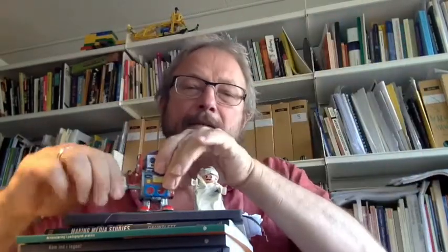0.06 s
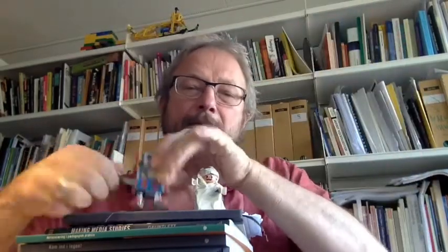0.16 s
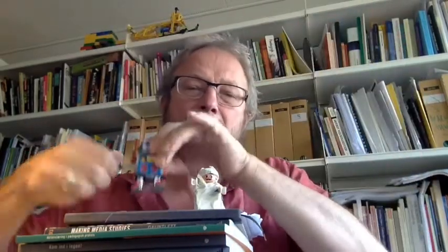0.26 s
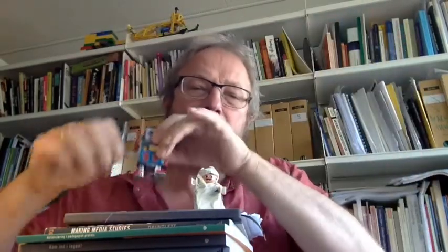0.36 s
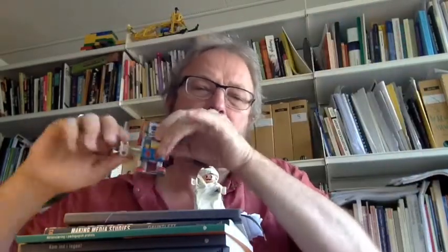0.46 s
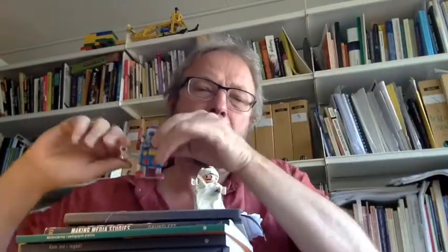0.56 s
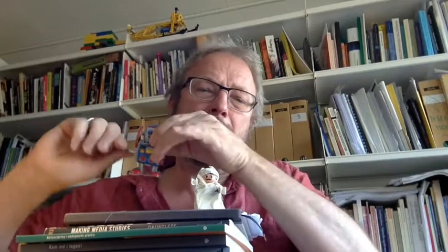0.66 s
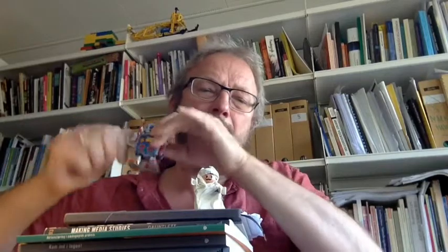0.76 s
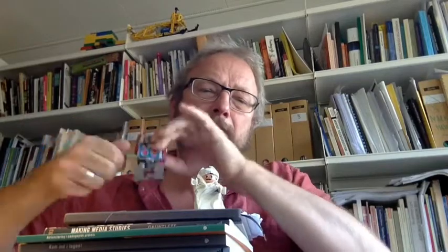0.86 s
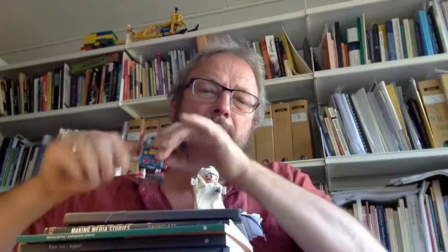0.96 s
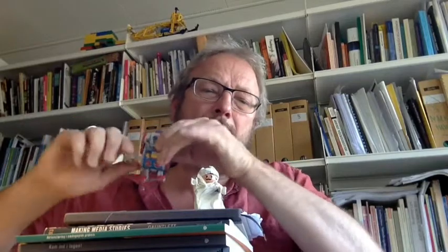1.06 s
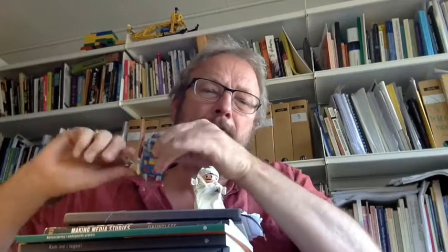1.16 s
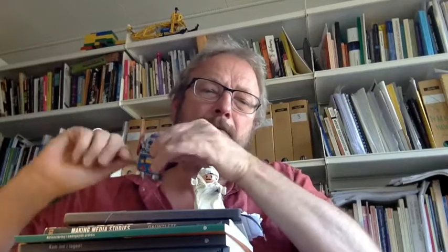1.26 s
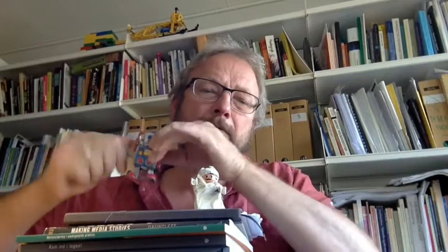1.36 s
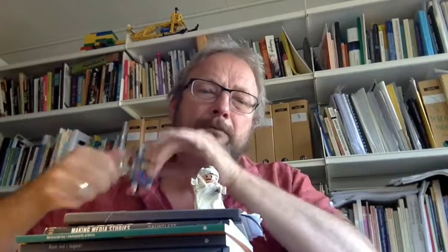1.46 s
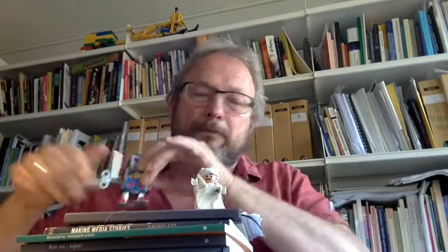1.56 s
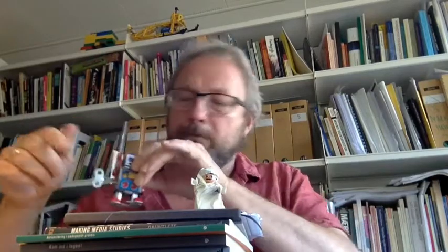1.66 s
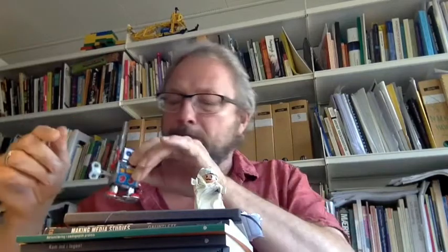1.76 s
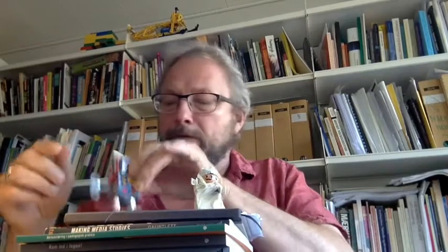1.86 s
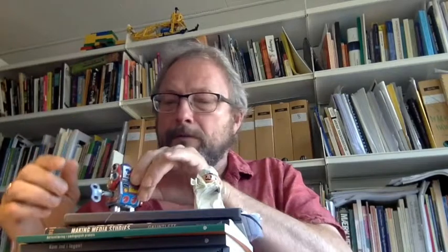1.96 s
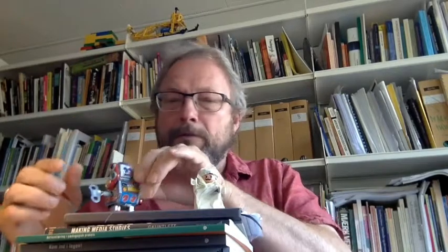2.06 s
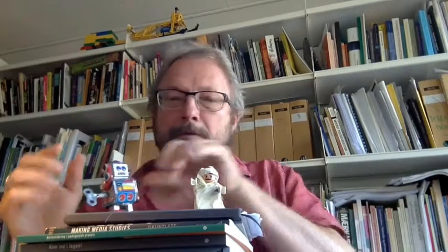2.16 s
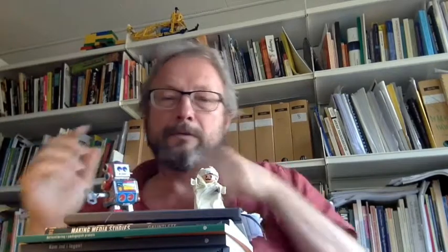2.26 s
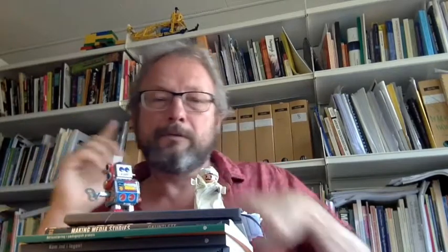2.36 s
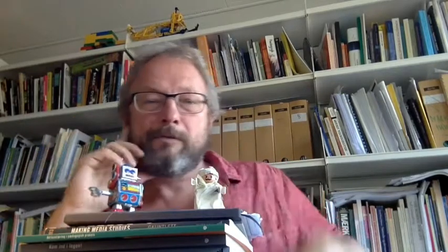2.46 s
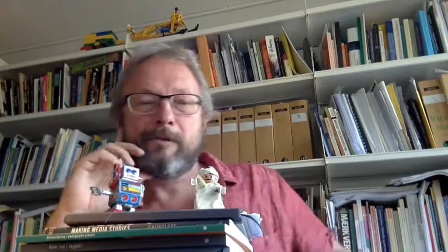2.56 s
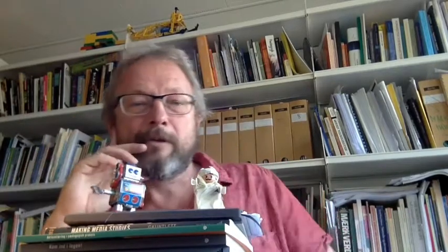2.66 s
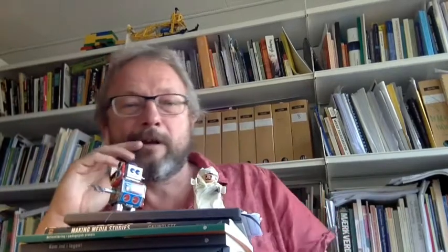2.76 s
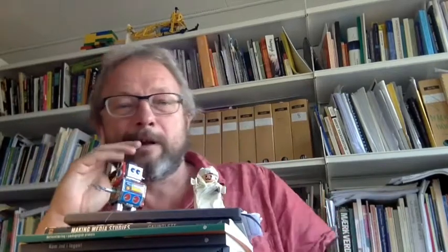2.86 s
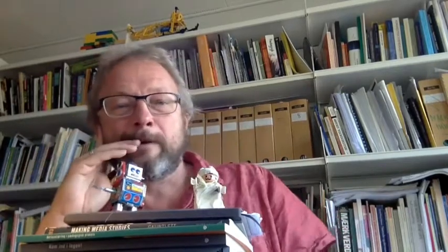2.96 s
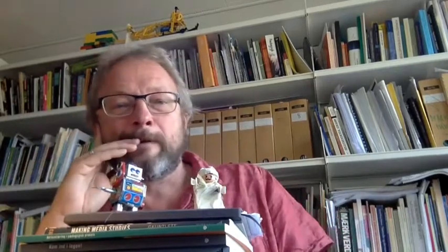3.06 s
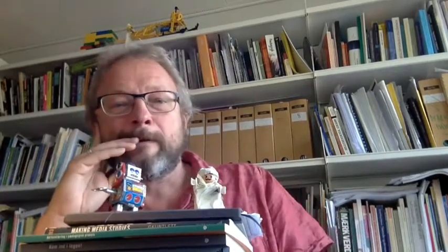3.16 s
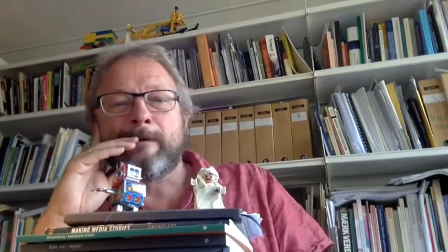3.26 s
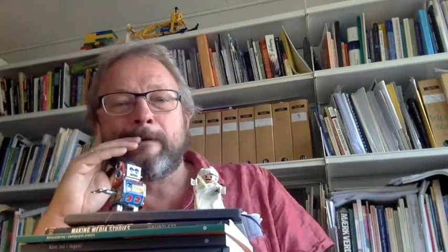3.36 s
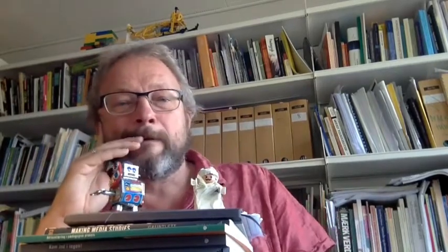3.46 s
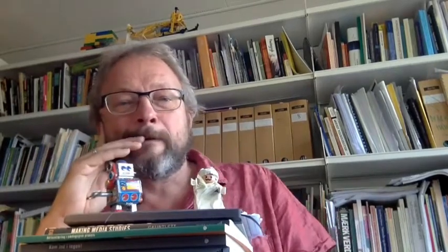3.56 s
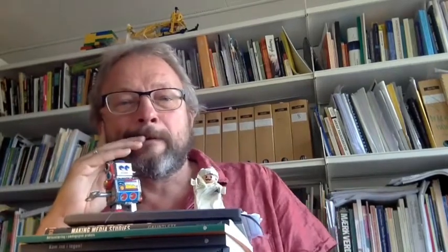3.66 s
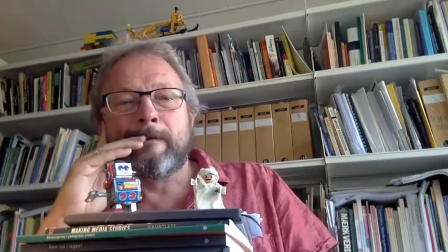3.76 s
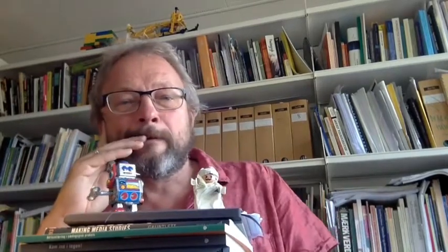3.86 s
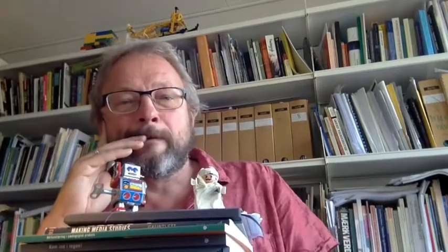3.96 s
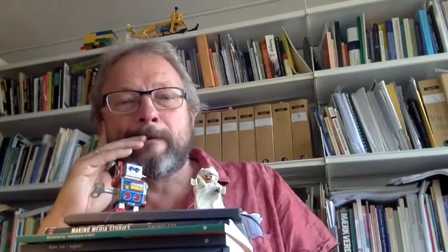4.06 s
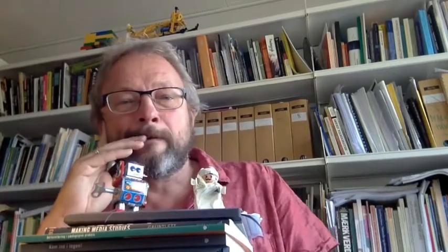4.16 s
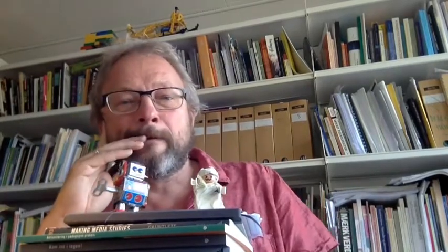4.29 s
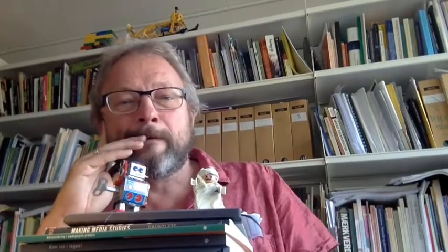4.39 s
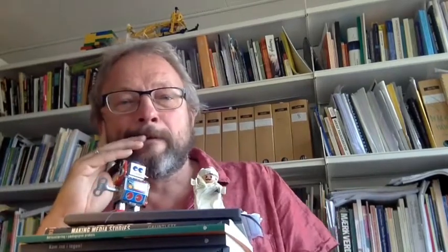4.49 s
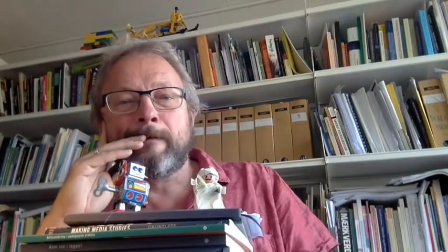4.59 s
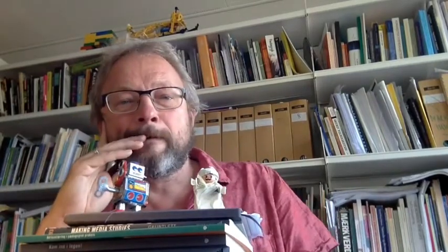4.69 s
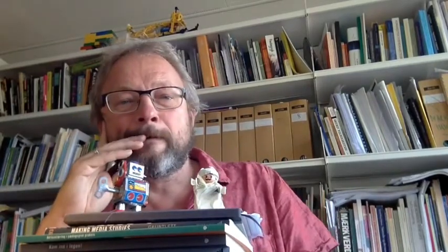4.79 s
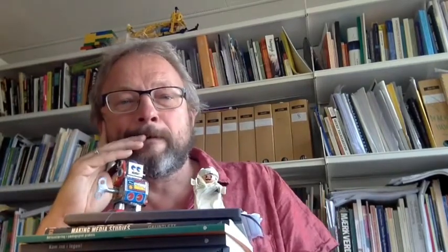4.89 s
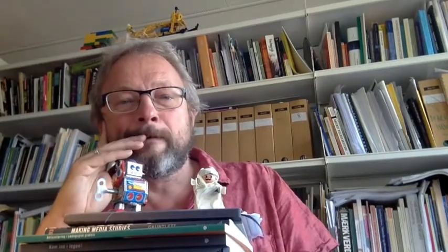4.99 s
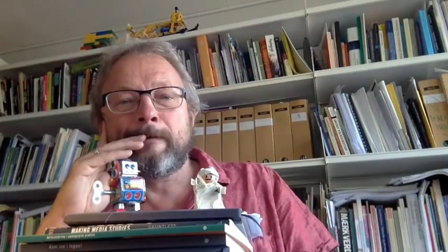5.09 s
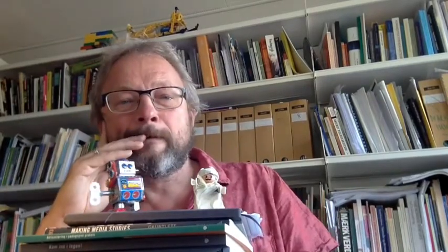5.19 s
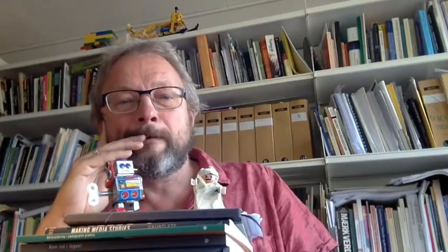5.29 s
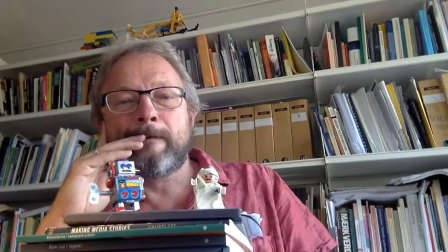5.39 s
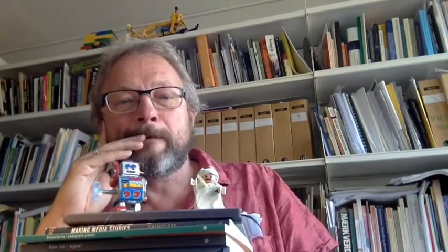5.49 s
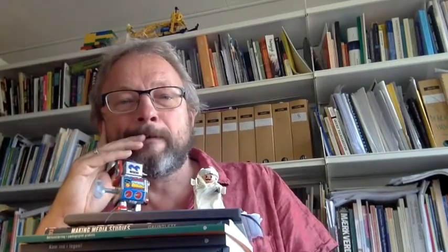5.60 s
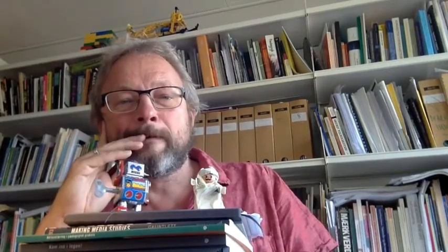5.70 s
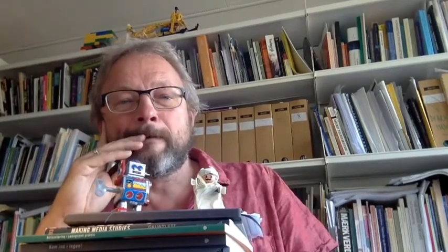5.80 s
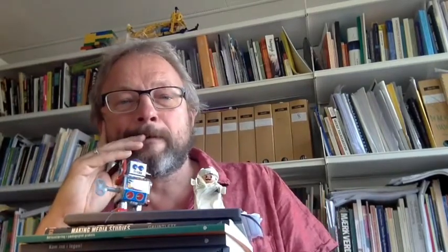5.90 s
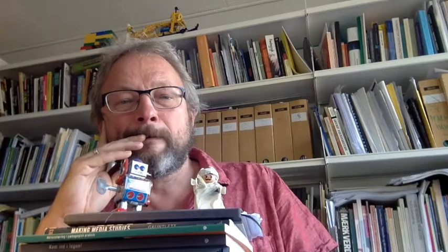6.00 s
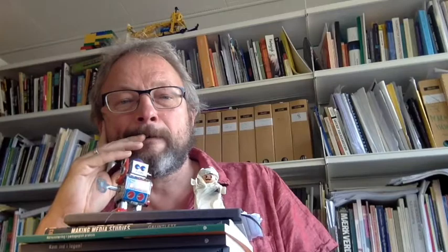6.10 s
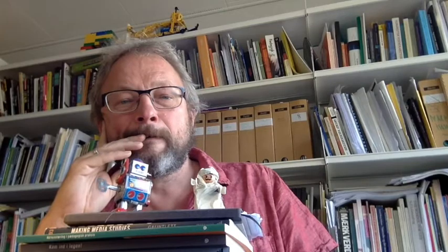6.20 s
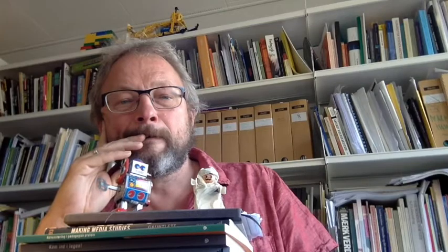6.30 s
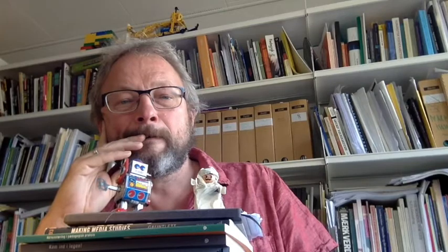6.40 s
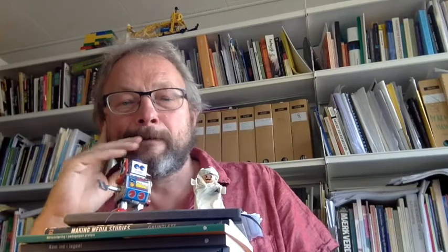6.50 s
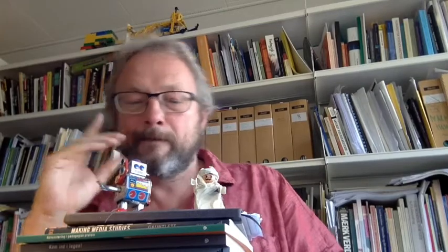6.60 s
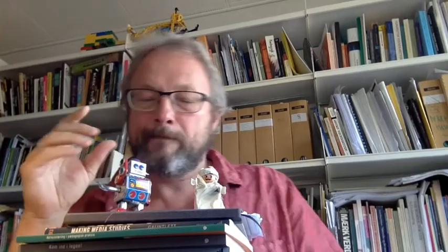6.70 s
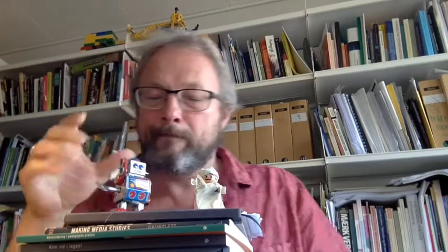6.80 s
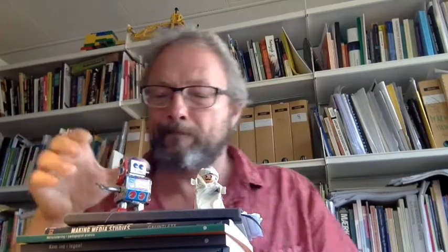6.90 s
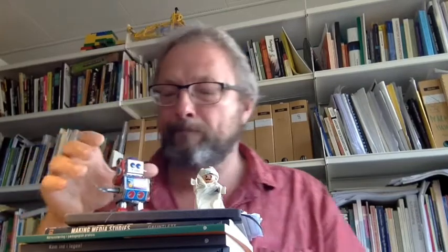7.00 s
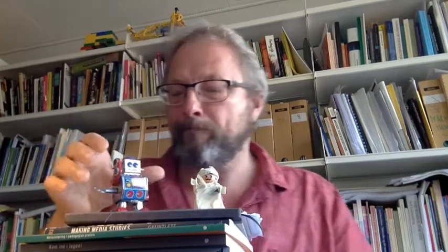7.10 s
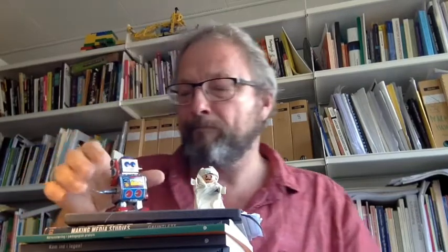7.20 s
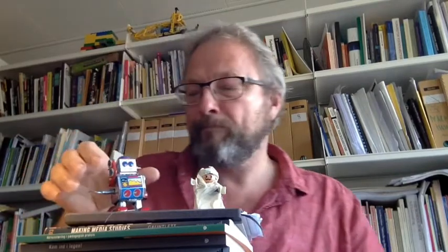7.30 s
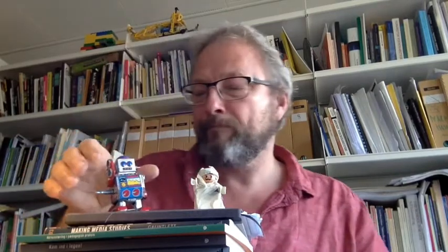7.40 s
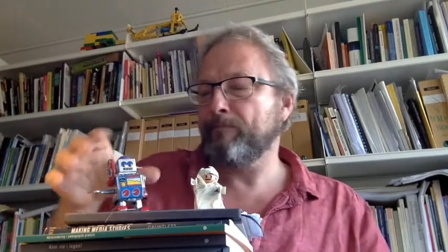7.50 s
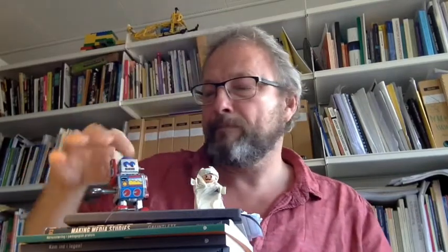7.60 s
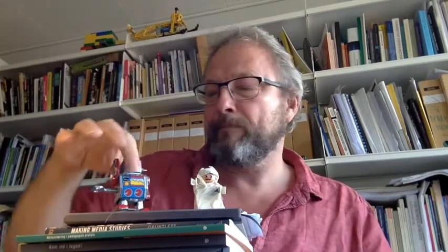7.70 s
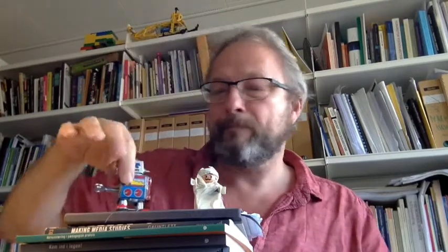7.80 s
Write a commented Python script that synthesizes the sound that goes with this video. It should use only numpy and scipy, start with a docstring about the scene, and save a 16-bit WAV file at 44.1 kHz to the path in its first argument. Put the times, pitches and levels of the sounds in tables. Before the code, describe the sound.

Close in a small book-lined study, a tin wind-up robot is wound by hand: hard pawl snaps, rasping ratchet and brief gear whirrs with short gaps. The key is released, the toy whirrs brightly and is set down with a hollow knock. Its feet clatter rapidly, with thin squeaks and a high whistle, then the rattle softens into a weak, uneven whirr.

```python
"""A tin clockwork robot is wound by hand: the pawl snaps, the ratchet rasps and the gears whirr between twists.
Near 1.6 s the key is let go and the toy is set down on a laptop lying on books; its feet clatter, the shell rings
and an axle whistles. The walk then softens, with spurts of whirr, and a forearm slides over the table near 6.7 s.
Contacts are dying noise bursts, panels are resonances and gears are trains of ticks, in a small study full of books."""
import sys
import numpy as np
from scipy import signal
from scipy.io import wavfile
from scipy.ndimage import uniform_filter1d

SR = 44100
rng = np.random.default_rng(int(sys.argv[2]) if len(sys.argv) > 2 else 0)


def log_audio(samples):
    """Write samples as a 16-bit WAV file to the path given in sys.argv[1]."""
    # one column per channel
    frames = np.atleast_2d(samples).T
    # limit to full scale, then quantise
    limited = np.clip(frames, -1, 1)
    pcm = np.round(limited * 32767).astype(np.int16)
    wavfile.write(sys.argv[1], SR, pcm)


N = 346185
T = np.arange(N) / SR


def amp(db):
    """Decibel law: a level as an amplitude ratio."""
    return 10 ** (np.asarray(db) / 20)


def decibels(power):
    """Decibel law: a power as a level."""
    return 10 * np.log10(power + 1e-12)


def evened(x):
    """Normalization to unit rms."""
    return x / np.sqrt(np.mean(x ** 2) + 1e-20)


def read(points, hz):
    """Interpolation of a spectrum on a logarithmic frequency axis."""
    f, value = np.transpose(points)
    return np.interp(np.log(hz + 1), np.log(f), value)


def along(rows):
    """Linear interpolation of a (time, value) curve at every sample."""
    return np.interp(T, *np.transpose(rows))


def add(mix, s, sound):
    """Superposition: a sound joins the mix at time s."""
    part = mix[max(round(s * SR), 0):][:len(sound)]
    part += sound[:len(part)]


def colour(x, tone, size=4096):
    """Minimum-phase filtering: the Hilbert transform of the log gain gives a causal response."""
    log_gain = np.log(amp(read(tone, abs(np.fft.fftfreq(size, 1 / SR)))))
    taps = np.fft.ifft(np.exp(np.conj(signal.hilbert(log_gain)))).real
    return signal.fftconvolve(x, taps[:size // 2])[:len(x)]


def below(x, hz):
    """Zero-phase low-pass filtering, run forward and backward."""
    return signal.sosfiltfilt(signal.butter(4, hz, fs=SR, output="sos"), x)


def resonate(x, hz, width):
    """Simple resonance of gain 1: one complex pole, at a fixed or moving frequency."""
    r = np.exp(-np.pi * width / SR)
    if np.ndim(hz) == 0:
        return 2 * signal.lfilter([1 - r], [1, -r * np.exp(2j * np.pi * hz / SR)], x).real
    turn = np.exp(2j * np.pi * np.cumsum(hz) / SR)
    return 2 * (turn * signal.lfilter([1 - r], [1, -r], x * turn.conj())).real


def wander(per_s):
    """Random modulation: Gaussian knots joined by straight lines."""
    knots = rng.standard_normal(2048)
    return np.interp(T * per_s, np.arange(len(knots)), knots)


def shifting(x, depth_db, size=11, order=4):
    """Time-variant transmission: as loose parts change contact, narrow bands glint and fade on their own."""
    _, at, z = signal.stft(x, nperseg=512, noverlap=384)
    patches = rng.standard_normal(z.shape)
    for _ in range(2):
        patches = uniform_filter1d(uniform_filter1d(patches, order, axis=0), size, axis=1)
    depth = np.interp(at, np.arange(N), depth_db * np.ones(N))
    power_correction_db = depth ** 2 * np.log(10) / 20  # about keeps the mean power
    gain_db = depth * np.clip(evened(patches), -2, 2) - power_correction_db
    return signal.istft(z * amp(gain_db), nperseg=512, noverlap=384)[1][:N]


def burst(t60, size=4096):
    """High modal density: the crowd of short-lived modes of struck thin metal is dying noise of unit energy."""
    x = rng.standard_normal(size) * amp(-60 * np.arange(size) / SR / t60)
    return x / np.linalg.norm(x)


def strike(t60, tone):
    """Impact excitation: one coloured burst with the energy of 10 ms at rms 1."""
    x = colour(burst(t60), tone)
    return x / np.linalg.norm(x) * np.sqrt(SR / 100)


def modes(rows):
    """Modal superposition: half a second of dying partials with a soft onset."""
    t = T[:SR // 2]
    partials = sum(amp(db - 60 * t / t60) * np.sin(2 * np.pi * hz * t) for hz, db, t60 in rows)
    return partials * (1 - np.exp(-t / 0.0041))


def gate(start, length, attack_s, release_db_per_s):
    """Envelope: linear attack, hold, then exponential decay."""
    t = T - start
    return np.clip(t / attack_s, 0, 1) * amp(-release_db_per_s * np.maximum(t - length, 0))


def handover():
    """Change of boundary condition: 0 while fingers clamp the toy, rising to 1 as the key is let go."""
    return np.clip((T - 1.57) / .05, 0, 1)


# Spectrum of the still air: (frequency [Hz], relative gain [dB])
AIR_TONE = [(15, -58), (30, -29), (50, 0.5), (90, -12), (130, -1.5), (175, -13.5), (270, 2), (400, -7.5),
            (700, -12.5), (1050, 0), (1350, -6), (2000, 3.5), (15500, -6)]


def air():
    """Stationary background noise: faint rumble and hiss, made uneven band by band."""
    return amp(-60.5) * evened(shifting(colour(rng.standard_normal(N), AIR_TONE), depth_db=2.6))


# Reverberation of the study: (frequency [Hz], t60 [s])
ROOM = [(150, 0.055), (1000, 0.32), (4000, 0.3), (15000, 0.13)]


def study(x):
    """Diffuse reverberation: convolution with noise whose bands decay at their own rates, 4 ms late."""
    hz, t, z = signal.stft(rng.standard_normal(SR // 2), SR, nperseg=256)
    tail = signal.istft(z * amp(-60 * t / read(ROOM, hz)[:, None]), SR)[1]
    tail = np.pad(tail, (SR // 250, 0))
    return signal.oaconvolve(x, tail / np.linalg.norm(tail))[:N]


# Spectrum of the forearm on the table: (frequency [Hz], relative gain [dB])
SLIDE_TONE = [(80, -30), (200, -9.5), (290, 4), (430, -1), (650, -18), (2000, -25.5)]
SLIDE_AT_S, SLIDE_DB = 6.67, -54.5  # the peak of the swell
SLIDE_RISE_DB_PER_S, SLIDE_FALL_DB_PER_S = 152, 157


def forearm_slide():
    """Friction noise: a forearm rubs the table in a swell that peaks and dies away."""
    rub, t = evened(colour(rng.standard_normal(N), SLIDE_TONE)), T - SLIDE_AT_S
    return rub * amp(SLIDE_DB + np.minimum(SLIDE_RISE_DB_PER_S * t, -SLIDE_FALL_DB_PER_S * t))


# Modes of the laptop on its books: (frequency [Hz], level [dB], t60 [s])
TABLE_MODES = [(134, -13, 0.13), (217, -7, 0.16), (261, -0.5, 0.11), (307, -20, 0.13), (406, -9, 0.043)]
# Modes of the desk under the books: (frequency [Hz], level [dB], t60 [s])
DESK_MODES = [(52, -3, .1), (74.6, 4.5, 0.13), (104.4, -6, 0.25)]
# Spectrum of the contact clack: (frequency [Hz], relative gain [dB])
CLACK_TONE = [(60, -32), (150, -12), (250, -0.5), (430, 1.5), (520, -4.5), (720, -7.5), (850, -1),
              (1080, 1), (1330, -8), (1550, 4.5), (1800, -3.5), (3000, -27), (6000, -29), (12000, -48)]
# Blows on the table top: (time [s], level [dB], low boom [dB re level], clack [dB re level])
KNOCKS = [(0.011, -52.5, -16, 9.5), (.029, -47, -12, 4.5), (0.088, -47.5, -22, 0.5),
          (0.134, -57.5, -12, 13.5), (1.88, -30, -15, -1.5), (2.099, -55.5, -20, 8),
          (2.607, -60.5, 10, -16), (2.666, -57, -3, -1), (2.709, -54, 1, 8), (4.246, -69, -17.5, 16.5),
          (4.317, -56.5, -18, 2), (4.527, -66, -25.5, 8), (7.2, -66, -22, 3), (7.287, -70, -16, 3),
          (7.306, -71, -18, 2), (7.388, -73, -13, 0)]


def table():
    """Impact on coupled structures: a clack, the laptop's hollow modes and the boom of the desk below."""
    out, hollow, boom = np.zeros(N), modes(TABLE_MODES), modes(DESK_MODES)
    for s, db, boom_db, clack_db in KNOCKS:
        add(out, s, amp(db) * (hollow + amp(boom_db) * boom))
        add(out, s, amp(db + clack_db) * strike(0.043, CLACK_TONE))
    return out


HUM_HZ, HUM_DB, HUM_WAVER = 80.6, -81.5, 0.17  # waver: fraction of the pitch
UPPER_HUM_HZ, UPPER_HUM_DB = 267, 0.5  # level re the lower tone
HUM_FROM_S, HUM_FOR_S, HUM_SWELL_DB = 1.92, 2.86, 2


def tremor():
    """Structure-borne vibration: the works shake the desk with two faint tones that waver together."""
    turns = np.cumsum(1 + HUM_WAVER * wander(22)) / SR
    hum = np.zeros(N)
    for hz, db in [(HUM_HZ, 0), (UPPER_HUM_HZ, UPPER_HUM_DB)]:
        swell_db = HUM_SWELL_DB * np.clip(wander(12), -1.5, 1.5)
        hum += amp(db + swell_db) * evened(np.sin(2 * np.pi * hz * turns))
    return amp(HUM_DB) * hum * gate(HUM_FROM_S, HUM_FOR_S, .08, 90)


# Squeaks of axles and skidding feet: (time [s], pitch [Hz], level [dB], length [s])
SQUEAKS = [(1.646, 4730, -42, 0.085), (2.203, 1000, -61, 0.032), (2.396, 1010, -54, 0.03),
           (2.748, 6840, -55, 0.29), (3.035, 1010, -55, 0.11), (3.186, 1030, -55.5, 0.052),
           (3.19, 4020, -48, 0.092), (3.4, 11740, -54, 0.095), (3.598, 11580, -49, 0.1),
           (3.614, 4550, -43.5, 0.066), (3.855, 930, -54.5, 0.034), (3.863, 15200, -55, .1),
           (3.873, 5400, -49, 0.086), (4.033, 4830, -42.5, 0.055), (4.512, 6400, -47, 0.04),
           (4.59, 5370, -50, 0.038), (5.13, 11850, -55.5, 0.11), (5.156, 12800, -57, 0.053),
           (5.86, 14050, -60, .05), (6.287, 1070, -65, 0.025), (6.42, 945, -63, 0.04),
           (6.44, 12500, -61, .11), (7.16, 15650, -45, 0.041)]


def squeaks():
    """Stick-slip friction: dry contacts sing briefly, as noise through two narrow resonances."""
    out = np.zeros(N)
    for s, hz, db, length in SQUEAKS:
        line = evened(resonate(resonate(rng.standard_normal(SR), hz, 160), hz, 180))
        line = line[SR // 4:][:round(length * SR)]  # past the build-up of the resonances
        add(out, s, amp(db) * line * signal.windows.tukey(len(line), .5))
    return out


# Whistle of the governor's axle: (time [s], pitch [Hz], level [dB])
WHISTLE = [(1.62, 11700, -50), (1.75, 11640, -48), (2.18, 11640, -49), (2.45, 11300, -52.5),
           (2.73, 11180, -52), (2.8, 11900, -52), (3.0, 11800, -45.5), (3.13, 11760, -55),
           (3.22, 11530, -78)]


def whistle(width_hz=330, flutter_db=5):
    """Friction-driven oscillation: a dry axle sings in one rough line that sags, recovers and flutters."""
    s, hz, db = np.transpose(WHISTLE)
    pitch = np.interp(T, s, hz) * (1 + 0.0052 * wander(25))
    line = resonate(resonate(rng.standard_normal(N), pitch, width_hz), pitch, width_hz)
    fluttering = evened(line * amp(flutter_db * np.clip(wander(45), -1.5, 1.5)))
    return fluttering * amp(np.interp(T, s, db, left=-120, right=-120))


# Speed of the walking crank: (time [s], rate [steps/s])
PACE = [(0, 17.7), (2.5, 19.3), (4.5, 19.2), (5.4, 16.3), (6.1, 13.5), (7, 13.8), (7.85, 16.1)]


def crank_rate():
    """Kinematic coupling: one crank sets the rate of gears, escapement and feet."""
    return along(PACE)


def teeth(per_step, spread_db, throb_db, t60):
    """Gear-mesh excitation: teeth tick in ratio to the crank, each a tiny dying burst, throbbing by the step."""
    steps = np.cumsum(crank_rate()) / SR
    passed = np.cumsum(np.gradient(steps) * (1 + .3 * wander(250))) * per_step
    force_db = spread_db * np.clip(rng.standard_normal(N), -2, 2) + throb_db * np.cos(2 * np.pi * steps)
    ticks = np.diff(np.floor(passed), prepend=0) * amp(force_db)
    energy = signal.lfilter([1], [1, -amp(-120 / t60 / SR)], ticks ** 2)  # power falls 60 dB in t60
    return evened(np.sqrt(energy) * rng.standard_normal(N))


def driven(x, whirr_db, ring_db, fizz_db):
    """Band-wise excitation: shell ring below 3 kHz, whirr up to 8.5 kHz and tooth fizz above."""
    low, body = below(x, 3000), below(x, 8500)
    return amp(whirr_db) * evened(body - low) + amp(ring_db) * evened(low) + amp(fizz_db) * evened(x - body)


FIZZ_HURRIES = 1.1  # exponent on the fizz envelope: it fades faster than whirr and ring


def strokes(rows, attack_s, release_db_per_s):
    """Energy addition: power of whirr, ring and fizz over like strokes (time, length, whirr, ring, fizz)."""
    pace = np.array([[1], [1], [FIZZ_HURRIES]])
    power = 0
    for s, length, db, ring_db, fizz_db in rows:
        envelope = (gate(s, length, attack_s, release_db_per_s) + 1e-9) ** pace
        power = power + (amp([[db], [db + ring_db], [db + fizz_db]]) * envelope) ** 2
    return power


# Twists of the key; levels of all gear strokes precede the gears' own trim:
# (time [s], length [s], whirr [dB], shell ring [dB re whirr], tooth fizz [dB re whirr])
TWISTS = [(0.009, 0.02, -37.5, -6.5, 6), (0.09, 0.025, -41, -4, 9), (0.133, 0.028, -37, -2.5, 7),
          (0.3407, 0.0046, -30.5, -6.5, 4), (.687, 0.136, -34, -6.5, 6), (1.297, .11, -35.5, -6, 5)]
TWIST_ATTACK_S, TWIST_RELEASE_DB_PER_S = 0.0023, 187
# Gears spinning on until the fingers brake them:
# (time [s], length [s], whirr [dB], shell ring [dB re whirr], tooth fizz [dB re whirr])
SPINS = [(.161, 0.072, -47, -13, 11.5), (.211, 0.083, -47, -1.5, 3), (.41, 0.13, -42, -4, 5.5),
         (.821, 0.061, -44.5, 5, 9.5), (.924, 0.23, -40, -3.5, 5.5), (1.411, 0.045, -41, -6, -8),
         (1.521, 0.21, -40.5, -15, -0.5)]
SPIN_ATTACK_S, BRAKE_DB_PER_S = 0.063, 392
# Fingers shifting their grip on the tin: (time [s], length [s], scrape [dB], shell ring [dB re scrape])
GRIPS = [(0.63, 0.05, -42, -10), (0.679, 0.012, -39, -10), (1.179, 0.036, -44, -3.5),
         (1.286, 0.016, -47, 2), (1.469, 0.017, -42.5, 2), (1.522, 0.034, -41.5, 1.5)]
GRIP_ATTACK_S, GRIP_RELEASE_DB_PER_S, GRIP_FIZZ_DB = 0.0048, 482, -7  # fizz re scrape
# Spectrum of the toy in the hand: (frequency [Hz], relative gain [dB])
HELD_TONE = [(100, -47), (450, -30), (750, -22), (1000, -9.5), (1350, -9), (1800, 12), (2400, 13),
             (3200, 0), (4700, 7), (5800, 1), (7000, -4), (9000, -20), (11000, -24), (15500, -24)]


def held_gears():
    """Contact damping: in the fingers the gears rasp at each twist and spin on until braked."""
    grips = [(*row, GRIP_FIZZ_DB) for row in GRIPS]
    power = (strokes(TWISTS, TWIST_ATTACK_S, TWIST_RELEASE_DB_PER_S) + strokes(SPINS, SPIN_ATTACK_S, BRAKE_DB_PER_S)
             + strokes(grips, GRIP_ATTACK_S, GRIP_RELEASE_DB_PER_S))
    ticks = shifting(teeth(per_step=16, spread_db=1.7, throb_db=0.0, t60=0.037), depth_db=2.73)
    return amp(-3) * driven(colour(ticks, HELD_TONE), *decibels(power)) * np.sqrt(1 - handover())


# Drive of the spring as it runs down: (time [s], whirr [dB])
DRIVE = [(1.6, -39.5), (1.68, -35.5), (1.87, -35), (1.96, -38), (2.5, -37.5), (3.05, -41), (3.5, -45.5),
         (3.63, -44), (3.76, -45), (3.93, -43), (4.15, -44.5), (4.7, -44.5), (5.08, -48.5), (5.24, -45.5),
         (5.7, -48), (6.2, -53), (6.6, -50.5), (6.76, -54), (7.1, -53.5), (7.85, -57)]


def spring_drive():
    """Energy release: the drive of the unwinding spring, as a level."""
    return along(DRIVE)


# Spurts of the spring: (time of the top [s], length [s], extra whirr [dB], extra sizzle [dB])
SPURTS = [(2.225, 0.054, 3, 2), (2.426, 0.097, 3, 4), (4.062, 0.084, -1.5, 0), (5.89, 0.16, 1.5, 10),
          (6.29, 0.14, 5.5, 4), (6.478, 0.41, 3.5, 4), (6.663, 0.068, 6, 4), (6.91, 0.073, 5.5, 12),
          (7.104, 0.055, 8.5, 13), (7.182, 0.16, 8, 17), (7.418, 0.26, 7, 8), (7.688, 0.27, 8.5, 13)]


def spurts():
    """Uneven energy release: extra dB of whirr and of sizzle, in cosine-squared swells."""
    return sum(np.outer(dbs, np.cos(np.pi * np.clip((T - s) / length, -.5, .5)) ** 2)
               for s, length, *dbs in SPURTS)


# Ring of the shell: (time [s], level [dB re whirr])
SHELL_RING = [(1.6, -5.5), (1.88, -3.5), (2.15, -3.5), (3, -0.5), (3.25, 2.5), (4.2, 1), (4.55, -3.5),
              (5.2, -4), (7.85, -3.5)]
# Treble fizz of the teeth: (time [s], level [dB re whirr])
FIZZ = [(1.6, 0), (1.8, 2.5), (2, -0.5), (2.35, -4.5), (2.8, -7), (3.3, -6.5), (3.95, -3), (4.6, -3),
        (7.85, -5.5)]
SPURT_FIZZ = 0.41  # extra dB of fizz, re whirr, per dB of spurt
# Jolt of the works on setting down:
# (time [s], length [s], whirr [dB], shell ring [dB re whirr], tooth fizz [dB re whirr])
JOLTS = [(1.881, 0.01, -27, -24, -2)]


def running_levels(uneven_db=0.67, shell_uneven_db=1.3, fizz_uneven_db=0.3, uneven_per_s=26):
    """Drive-dependent radiation: whirr, ring and fizz follow the spring unevenly; jolts add in power."""
    spurt_db = spurts()[0]
    whirr_db = spring_drive() + spurt_db + uneven_db * wander(uneven_per_s)
    ring_db = whirr_db + along(SHELL_RING) + shell_uneven_db * wander(uneven_per_s)
    fizz_db = whirr_db + along(FIZZ) + SPURT_FIZZ * spurt_db + fizz_uneven_db * wander(uneven_per_s)
    return decibels(amp([whirr_db, ring_db, fizz_db]) ** 2 + strokes(JOLTS, TWIST_ATTACK_S, BRAKE_DB_PER_S))


# Spectrum of the freed toy, for rattle and escapement: (frequency [Hz], relative gain [dB])
FREE_TONE = [(120, -36), (280, -24), (450, -25.5), (700, -33), (1020, -15), (1220, -17.5), (1350, -21),
             (1600, -8.5), (1800, -4), (2600, -12), (3000, -4), (3450, -7.5), (4100, -5.5), (7000, -5),
             (7800, -10), (8250, -10), (9200, -18.5), (12000, -17.5), (13500, -17), (15500, -16)]
TICKS_PER_STEP, TICK_SPREAD_DB, TICK_T60 = 9, 2.5, .008  # t60 in s


def escapement(size=8):
    """Periodic impact: the governor's pallets tick in a slightly uneven train, on one of a few contacts."""
    passed = np.cumsum(crank_rate() * (1 + .2 * wander(200))) * TICKS_PER_STEP / SR
    ticks = np.diff(np.floor(passed), prepend=0) * amp(TICK_SPREAD_DB * np.clip(rng.standard_normal(N), -2, 2))
    contact = rng.integers(size, size=N)
    train = sum(signal.oaconvolve(ticks * (contact == k), burst(TICK_T60, size=512))[:N] for k in range(size))
    return evened(colour(train, FREE_TONE))


# Ringing of small wheels and arbors: (frequency [Hz], relative level [dB])
WHEELS = [(3900, 4), (4260, 4.5), (4720, 5.5), (5050, 4.5), (5450, 5.5), (5750, 2), (6100, 2), (7030, 4),
          (8240, -1), (8850, -1), (9550, -3), (10400, -7), (11350, -4), (12100, -5), (12700, -3),
          (13150, -5), (13550, -1.5), (14100, -4), (14550, -4), (15050, -3), (15550, -2)]
# Song of the wheels: (time [s], level [dB re rattle])
SINGING = [(1.6, -9), (2.1, -2), (3.1, -2), (3.9, -6), (4.4, -14), (5.2, -13), (7.85, -12)]


def wheel_song(detune=0.0202, width_hz=170):
    """Granular resonance: small wheels catch and sing for 14 to 70 ms, each time at a slightly different pitch."""
    out, smooth = np.zeros(N), np.exp(-np.pi * width_hz / SR)
    rough = evened(signal.lfilter([1], [1, -2 * smooth, smooth ** 2], rng.standard_normal(N)))
    per_s, spread_db, shortest, longest = 220, 10, .014, .07
    for when, which, pitch, size, length in rng.random((int(N / SR * per_s), 5)):
        hz, db = WHEELS[int(which * len(WHEELS))]
        grain = rough[int(when * N):][:int((shortest + (longest - shortest) * length) * SR)]
        t = T[:len(grain)]
        shape = np.sin(np.pi * np.sqrt(t / (t[-1] + 1 / SR)))  # quick catch, slower release
        tone = np.sin(2 * np.pi * hz * (1 + detune * (2 * pitch - 1)) * t)
        add(out, when * N / SR, amp(db + spread_db * size) * shape * grain * tone)
    return evened(out) * amp(along(SINGING))


# Modes of the tin shell: (frequency [Hz], bandwidth [Hz], relative level [dB])
SHELL = [(1810, 220, -3), (1955, 72, -1), (2074, 55, 10.5), (2217, 59, 4.5), (2433, 44, 9), (2585, 59, 8),
         (2690, 51, 10), (3280, 41, 0.5), (3770, 100, 2.5), (3996, 74, 8), (4300, 200, 7), (4780, 270, 7),
         (5170, 210, 2.5), (5370, 94, 1.5)]
# Depth to which narrow bands of the rattle glint and fade: (time [s], depth [dB])
GLINT = [(1.6, 2), (1.95, 2.2), (2.2, 3), (3.2, 3.2), (4, 2.8), (4.8, 2.2), (7.85, 2.4)]


def free_gears(count=3, drift=.011):
    """Forced vibration of a shell: wheels tick and ring modes that drift, swell and fade as loose panels touch."""
    ticks = [teeth(per_step=7 + 3 * k, spread_db=1.5, throb_db=1.5, t60=0.023) for k in range(count)]
    ring = np.zeros(N)
    for k, (hz, width, db) in enumerate(SHELL):
        swell_db = 2.0 * np.clip(wander(24), -1.5, 1.5)
        mode = resonate(ticks[k % count], hz * (1 + drift * wander(14)), width)
        ring += amp(db + swell_db) * evened(mode)
    ring = ring - below(ring, 1820)  # small panels radiate little bass
    rattle = evened(colour(teeth(per_step=15, spread_db=0.3, throb_db=2.5, t60=0.059), FREE_TONE))
    rattle = rattle + amp(-6) * escapement()
    sound = evened(shifting(rattle, along(GLINT))) + amp(0.5) * evened(ring) + wheel_song()
    return amp(-3.5) * driven(sound, *running_levels()) * np.sqrt(handover())


SIZZLE_DB, SIZZLE_PER_DRIVE = -2, 1.3  # re the drive at its fullest; extra dB per dB of drive


def sizzle(least_db=-9):
    """Nonlinear excitation: above 12.5 kHz the teeth fade faster than the drive, down to a floor."""
    x, drive_db = shifting(teeth(per_step=13, spread_db=2.5, throb_db=1, t60=0.025), depth_db=4), spring_drive()
    force_db = np.maximum(SIZZLE_PER_DRIVE * (drive_db - drive_db.max()), least_db) + spurts()[1]
    return evened(x - below(x, 12500)) * amp(drive_db + SIZZLE_DB + force_db) * handover()


# Spectrum of the body knocking on its feet: (frequency [Hz], relative gain [dB])
ROCKING_TONE = [(150, -21), (270, -4), (360, -20), (430, 4), (660, -21), (800, 11), (920, 16), (1060, 13),
                (1200, -10), (1350, -11), (2500, -39)]
ROCKING_PER_S, ROCKING_LEAST_DB, ROCKING_RANGE_DB = 22, -24.5, 1  # levels re the drive


def rocking():
    """Random impact process: the toy rocks from heel to toe with many soft, hollow ticks at chance times."""
    out, drive_db = np.zeros(N), spring_drive()
    for when, force in rng.random((int(N / SR * ROCKING_PER_S), 2)):
        at = int(when * N)
        level_db = drive_db[at] + ROCKING_LEAST_DB + ROCKING_RANGE_DB * force
        add(out, at / SR, amp(level_db) * strike(0.035, ROCKING_TONE))
    return out * handover()


# Spectrum of the crack: (frequency [Hz], relative gain [dB])
PAWL_TONE = [(200, -62), (800, -21), (1300, -12.5), (1800, 5.5), (2400, -3.5), (3100, -11.5), (4700, -9.5),
             (7000, -1.5), (9000, -23), (15500, -5)]
# Spectrum of the thud in the fingers: (frequency [Hz], relative gain [dB])
THUD_TONE = [(120, -57), (300, -30), (450, 4), (580, 2), (750, -26), (1050, 1.5), (1800, -11), (4000, -22)]
SNAP_SPIKE_DB, SNAP_SPIKE_T60 = -5.5, 0.011  # first contact, re the longer ringing; t60 in s


def snap(ring_db, thud_db, edge_db):
    """Impact of stiff bodies: a crack, sharp at first contact, rings the shell and thuds dully in the hand."""
    crack = amp(-3) * (strike(0.056, PAWL_TONE) + amp(SNAP_SPIKE_DB) * strike(SNAP_SPIKE_T60, PAWL_TONE))
    low, body = below(crack, 3000), below(crack, 8500)
    metal = body - low + amp(ring_db) * low + amp(edge_db) * (crack - body)
    return metal + amp(thud_db) * strike(0.032, THUD_TONE)


# Loud snaps of pawl and key, the last three being gains inside the snap:
# (time [s], level [dB], shell ring [dB], thud in the fingers [dB], edge [dB])
PAWL = [(0.0096, -30, -7, -34, -3), (0.0881, -24.5, -25, -27, 4), (0.1007, -37, -13, -5, -12),
        (0.1409, -25, -3, -26, 6.5), (0.3429, -21.5, -3, -27, -5), (0.353, -30, -8, -50, -14),
        (0.3745, -39, -5, -47, -10), (0.468, -38, 3, -52, -8), (0.632, -52, -4, -36, -10),
        (0.6912, -27, -3, -27, -12), (0.7007, -28, -8, -48, -10), (0.7088, -36, -7, -45, -11),
        (0.72, -27, 2.5, -19, -8), (0.728, -29, -8, -38, -8), (0.7353, -24.5, 0, -43, -10),
        (0.7562, -23.5, -4, -24.5, -8), (0.7653, -26, -1, -45, -7), (0.776, -35, -7, -45, -9),
        (0.795, -25, -5, -45, -10), (0.8038, -26, -4, -45, -9), (0.8236, -30, -9, -45, -9),
        (0.9219, -27.5, 0, -26.5, -12), (0.937, -24.5, -10, -50, -2), (1.3034, -33.5, 5, -20, 9),
        (1.3334, -26.5, -4, -33, 4), (1.345, -27, 5, -45, -4), (1.3986, -24, -5, -50, 0),
        (1.516, -32, 4.5, -25, -26), (1.5258, -39, -1, -47, -14), (1.541, -37, -1, -45, -14)]
RATCHET_PER_S, RATCHET_SPREAD_DB = 100, 4  # small snaps within a twist, around the twist's whirr level


def pawl():
    """Ratchet impacts: the pawl skips over teeth all through a twist, and a few snap hard."""
    out = np.zeros(N)
    for s, db, *timbre in PAWL:
        add(out, s, amp(db) * snap(*timbre))
    for start, length, db, *_ in TWISTS:
        for tooth in range(1, int(length * RATCHET_PER_S) + 1):
            s = start + (tooth - rng.random() / 2) / RATCHET_PER_S
            level_db = db + RATCHET_SPREAD_DB * rng.standard_normal()
            add(out, s, amp(level_db) * snap(ring_db=-4.5, thud_db=-42, edge_db=-27))
    return out


# How hard the feet stamp: (time [s], extra level [dB])
STAMP = [(1.95, 12), (2.1, 11.5), (3, 14), (3.55, -10), (4, 0), (4.75, -17), (5.1, -31), (7.85, -25)]
STEP_DB, STEP_SPREAD_DB, STEP_EDGE_DB = -47, 1, -6  # before the gains inside a bounce
PANEL_HZ, STEP_SCATTER_S = (1890, 2666), .028  # range of panels; greatest lead or lag


def footfalls():
    """Quasi-periodic impact: one footfall near each crank step, as (time, level, edge, panel pitch) rows."""
    times = T[1:][np.diff(np.floor(np.cumsum(crank_rate()) / SR)) > 0]
    rows = []
    for s, (late, force, panel) in zip(times, rng.uniform(-1, 1, (256, 3))):
        if s > STAMP[0][0]:
            level_db = STEP_DB + np.interp(s, *np.transpose(STAMP)) + STEP_SPREAD_DB * force
            hz = np.interp(panel, (-1, 1), PANEL_HZ)
            rows.append((s + STEP_SCATTER_S * late, level_db, STEP_EDGE_DB, hz))
    return rows


# Spectrum of a tin foot: (frequency [Hz], relative gain [dB])
FOOT_TONE = [(200, -26), (700, -19.5), (1000, -8), (1350, -17), (1850, 3), (2100, 7.5), (2650, 16.5),
             (3300, 4), (4100, 17), (5200, 7), (7000, -12), (9500, -55), (15500, -39)]
# Individual footfalls, the first row being the jolt of the toy set down, before the gains inside a bounce: #
# (time [s], level [dB], edge [dB re level], nominal panel pitch [Hz])
CLATTER = [(1.8811, -30, -20, 2180), (2.1113, -31, -10, 2130), (2.149, -36, -8, 2370),
           (2.2132, -38, -12, 1990), (2.2503, -38, -5, 2300), (2.2772, -34, -2, 2050),
           (2.4038, -38, -5, 2470), (2.4226, -32, -9, 2440), (2.4757, -35.5, -10, 2240),
           (2.5665, -34, 1, 2800), (2.6824, -33, -7, 2550), (2.7, -36, -8, 2570), (2.7786, -39, 5, 2370),
           (2.8416, -34, -12, 2460), (2.8678, -38, -8, 2560), (2.975, -37, -10, 2650),
           (3.0028, -38.5, 2, 2430), (3.032, -36, -2, 2710), (3.1587, -38.5, 4, 2610),
           (3.252, -49, -3, 2630), (3.1944, -36, -26, 2700), (3.292, -36, -10, 2610),
           (3.3648, -35.5, -3.5, 1996), (3.4684, -37, -6, 2580), (3.5376, -36, -2.5, 2660),
           (3.6468, -34.5, -4, 2490), (3.672, -32.5, -19, 2710), (3.696, -41, -8, 2120),
           (3.756, -37, -13, 2690), (3.8076, -31.5, -9.5, 2650), (3.8752, -35, -2, 1950),
           (3.919, -38, -8, 2400), (3.931, -32.5, -4, 2750), (3.9495, -34, -9, 2070),
           (3.97, -33, -10, 1886), (4.0094, -40, -14, 2060), (4.0466, -46, 1, 2400),
           (4.0763, -34.5, -18, 2546), (4.1115, -40, -24, 2690), (4.1409, -33, -20, 2690),
           (4.2562, -39, -22, 1990), (4.303, -36, -27, 2400), (4.352, -37, -22, 2360),
           (4.373, -39, -20, 2520), (4.4278, -34.5, -23, 2030), (4.4807, -35, -20, 2060),
           (4.4948, -33.5, -20, 2025), (4.5394, -46, -24, 2070), (4.6016, -37, -6, 2050),
           (4.6413, -34.5, -27, 2610), (4.693, -36, -25, 2050), (4.7595, -43, -22, 2540),
           (4.8182, -36, -30, 2020), (4.9038, -45, -24, 2070), (4.9641, -42.5, -14, 2700),
           (5.35, -50, -11, 2720), (6.916, -47, -14, 2730), (7.1006, -43, -8, 2105),
           (7.169, -42.5, -6, 2700), (7.266, -48.5, -6, 2690), (7.3404, -44, -14, 2713),
           (7.513, -49, -4, 2650)]
CHATTER_S, CHATTER_FADE_DB = .0052, 3  # nominal gap between bounces, and the loss at each
PANEL_T60 = .032  # s


def feet(count=6, size=32):
    """Repeated inelastic impact: a tin foot chatters, losing energy, and rings a panel anew at each bounce."""
    out, taps = np.zeros(N), np.array([strike(0.027, FOOT_TONE) for _ in range(size)])
    lows, t = below(taps, 3000), T[:taps.shape[1]]
    dying = amp(-60 * t / PANEL_T60) * (1 - np.exp(-t / 0.00072)) ** 2
    for s, db, edge_db, hz in CLATTER + footfalls():
        gaps = CHATTER_S * rng.uniform(.5, 1.6, count)
        delays = np.cumsum(gaps) - gaps[0]
        for k, (delay, pick) in enumerate(zip(delays, rng.integers(size, size=count))):
            bounce_hz = hz * (1 + 0.025 * rng.uniform(-0.54, 1))
            panel = np.sin(2 * np.pi * bounce_hz * t) * dying
            edge = taps[pick] - lows[pick]
            bounce = amp(-7.5) * lows[pick] + amp(4.5) * panel + amp(edge_db - 2) * edge
            add(out, s + delay, amp(db - CHATTER_FADE_DB * k) * bounce)
    return out


def scene():
    """Superposition of direct and reverberant sound: the toy on its books, the study and the still air."""
    surroundings = forearm_slide() + table() + tremor() + squeaks() + whistle()
    toy = surroundings + held_gears() + free_gears() + rocking() + pawl() + feet()
    return (toy + amp(-6.0) * study(toy) + air())[None]


def record(dry):
    """Band limitation of the microphone: high-pass at 36 Hz, steep low-pass at 15.85 kHz."""
    dry = signal.sosfilt(signal.butter(4, 36, "highpass", fs=SR, output="sos"), dry)
    return signal.oaconvolve(dry, signal.firwin(601, 15850, window=("kaiser", 9), fs=SR)[None], "same")


dry = scene()
out = record(dry)
log_audio(out)
```